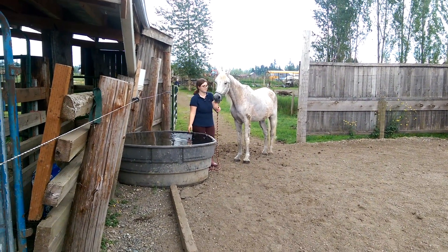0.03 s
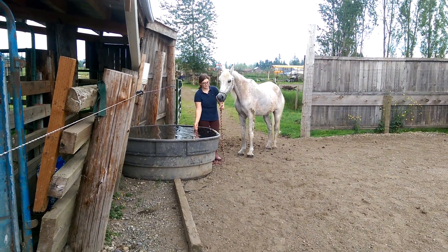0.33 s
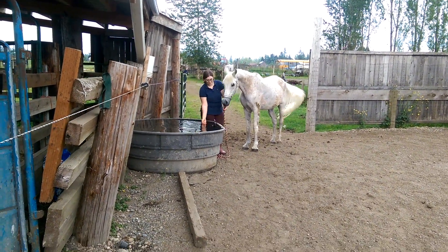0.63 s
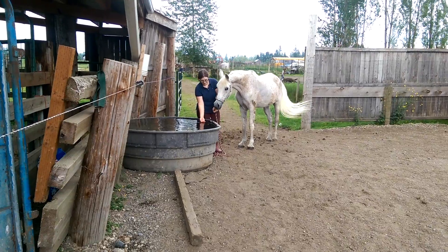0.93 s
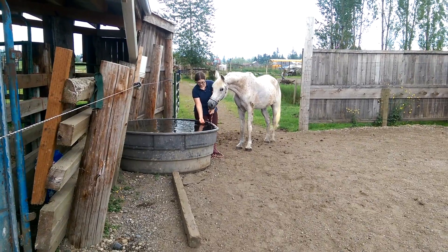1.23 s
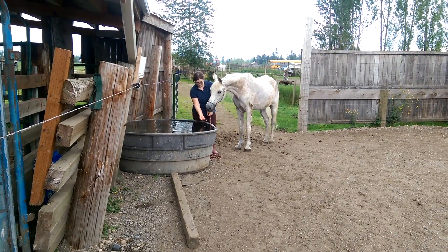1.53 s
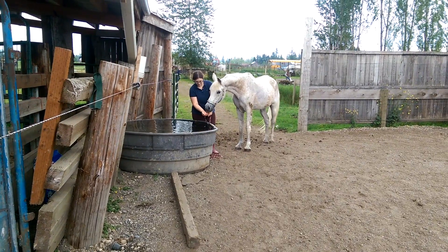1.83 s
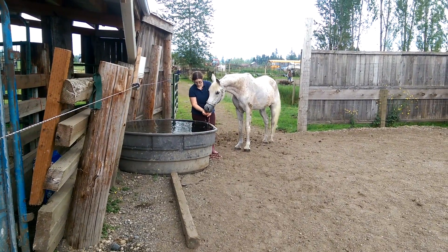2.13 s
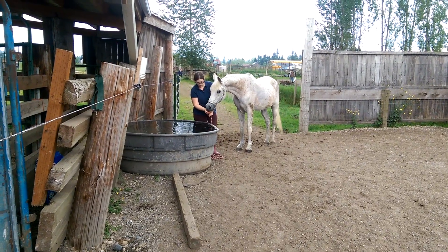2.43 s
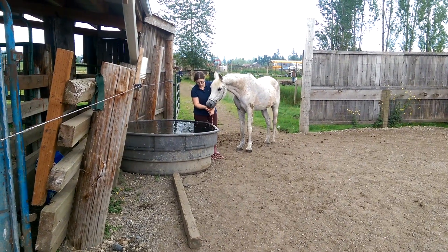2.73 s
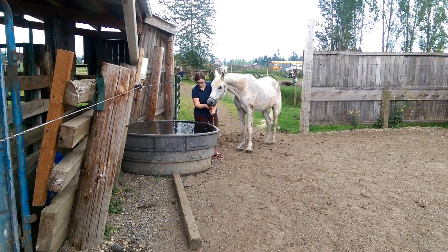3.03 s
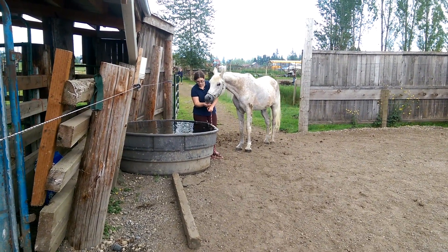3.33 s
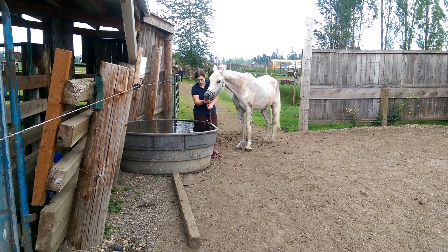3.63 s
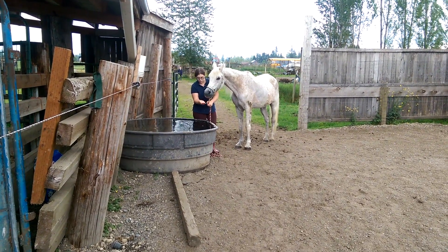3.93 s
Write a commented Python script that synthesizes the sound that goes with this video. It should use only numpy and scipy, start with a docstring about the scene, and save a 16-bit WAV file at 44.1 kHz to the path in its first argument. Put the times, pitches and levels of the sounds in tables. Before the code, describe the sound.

Quiet open-air background noise fills a dirt paddock: a soft hiss of air and leaves over a distant engine hum. A horse stamps once with a dull thud, and faint far birds chirp among small ticks and taps.

```python
"""A distant engine hums under a soft hiss of air and leaves, heard in stereo from a dirt paddock's edge.
Far birds whistle slurred notes that scatter off barn, fence and trees. A second in, a horse stamps
one hoof and the ground rings with a dull thud. Bubbles plip in a trough, rising in pitch as they
surface; small ticks, taps and scuffs come from near it, and one click from by the left microphone."""
import sys
import numpy as np
from scipy import signal
from scipy.fft import rfft, irfft, next_fast_len
from scipy.io import wavfile
from scipy.ndimage import map_coordinates

SR = 44100
rng = np.random.default_rng(int(sys.argv[2]) if len(sys.argv) > 2 else 0)


def file_out(sig):
    """Save sig as 16-bit WAV at sys.argv[1]."""
    # one column per channel
    cols = np.atleast_2d(sig).T
    # limit, then scale
    lim = np.clip(cols, -1, 1)
    pcm = np.round(lim * 32767).astype(np.int16)
    wavfile.write(sys.argv[1], SR, pcm)


N = 176400
T = np.arange(N) / SR

# air and leaves all around: f/Hz, relative level/dB
AIR_SPECTRUM = [(82, -42), (140, -2), (238, -5.5), (333, -5.5), (466, -8.5), (504, -7.5), (602, -10.5),
                (859, -9), (930, -10), (1250, -12), (3100, -9), (6680, -15), (9160, -17), (14100, -25),
                (15600, -45)]
# the side the hiss leans to: f/Hz, pan/dB (left minus right throughout)
AIR_PAN = [(200, 2.5), (550, 2.8), (2000, -0.1), (4000, 1), (8000, -1.2), (10000, 3), (12500, -5)]
# how alike diffuse noise is at the two microphones: f/Hz, coherence
COHERENCE = [(60, 0.65), (150, 0.66), (300, 0.69), (550, 0.44), (1000, 0.14), (2000, -0.18), (12000, 0.032)]
# the far engine's shaft rotation: t/s, f/Hz
SHAFT_SPEED = [(0, 33.1), (1, 33), (1.5, 32.61), (4, 32.62)]
# its hum at twice the shaft rate: t/s, level/dB
SECOND_ORDER = [(0, -49.5), (.18, -52), (.45, -55), (.9, -49.5), (1.1, -48.5), (1.35, -53.5), (1.53, -58.5),
                (1.7, -54.5), (1.85, -51), (2.1, -48.5), (2.4, -49), (2.72, -53), (3.05, -49.8), (3.4, -49),
                (3.75, -50.5), (3.87, -54.5), (4, -51.5)]
# its hum at three times the shaft rate: t/s, level/dB
THIRD_ORDER = [(0, -65), (.3, -56.5), (.52, -54), (.85, -63), (1.25, -57), (1.599, -62), (1.85, -55),
               (2.05, -54.5), (2.35, -68), (2.65, -55), (2.95, -56.5), (3.17, -67.5), (3.42, -58),
               (3.7, -58), (4, -64)]
# the rumble under the hum: f/Hz, relative level/dB
RUMBLE_SPECTRUM = [(18, -14), (35, -0.5), (55, 1), (82, 4), (100, 2.5), (122, -1.5), (145, -5.5),
                   (190, -33.5)]
# far bird notes: t/s, length/s, start f/Hz, middle f/Hz, end f/Hz, relative level/dB, pan/dB
CHIRPS = [(0.485, 0.071, 2850, 3050, 3120, -71.5, -4), (1.102, .05, 2900, 3140, 3270, -73, 0),
          (1.53, 0.22, 3350, 4306, 4780, -69.5, -8), (1.854, 0.038, 5000, 4180, 3400, -66.5, -5),
          (2.3, 0.031, 3900, 4300, 4700, -67, -4), (2.346, 0.083, 3300, 2963, 3110, -70, -4),
          (2.49, .09, 4390, 3435, 2866, -67, -9), (2.549, .04, 4400, 4020, 3630, -69, -2),
          (2.58, .08, 3070, 2960, 3400, -76, -8), (2.83, 0.057, 4720, 4150, 3118, -61.5, -5),
          (2.898, 0.033, 4100, 3650, 3250, -67, 3)]
# farther calls, blurred into a band of noise: t/s, length/s, level/dB
TWITTERS = [(.54, .08, -66), (1.121, 0.092, -66.5), (2.52, 0.13, -66.5), (3.49, .07, -69)]
# one nearer note, thin and high: t/s, length/s, start f/Hz, end f/Hz
PEEP = (.303, .052, 8650, 8590)
# sharp ticks near the trough: t/s, relative level/dB, f/Hz, t60/s, Q, pan/dB
TICKS = [(0.4, -52, 10000, 0.018, 1, 6), (.827, -53, 9000, .012, 1, 2), (1.026, -54, 10000, .02, 1, 2),
         (2.1717, -46, 9500, 0.013, 3.3, 7), (2.177, -55, 10000, 0.034, 1.4, 4),
         (2.409, -56, 13000, .015, 1, 0)]
# a dry click right by the left microphone: t/s, level/dB, f/Hz, t60/s, pan/dB
CLICKS = [(0.9625, -29.5, 8800, 0.00056, 26)]
# light taps: t/s, level/dB, f/Hz, t60/s, Q
TAPS = [(.47, -59.5, 2070, .14, 3.4), (0.774, -58, 970, 0.13, 0.83), (1.596, -58, 1630, 0.076, 3.3),
        (1.768, -56.5, 2270, 0.1, 5), (3.355, -61, 2000, .1, 3), (3.38, -61, 2300, 0.098, 3),
        (3.903, -57.5, 4150, 0.18, 5.8), (3.918, -52, 199, 0.091, 1.9)]
# scuffs on dirt: t/s, rise/s, hold/s, t60/s, level/dB, pan/dB
SCUFFS = [(-.02, 0.029, 0.2, 1.35, -60, -6), (3.886, .01, .03, 0.6, -61.5, 5)]
# one spectrum for each scuff: f/Hz, relative level/dB
SCUFF_SPECTRA = [
    [(120, -8), (330, 6), (450, -2.5), (620, 0), (950, -9), (1600, -0.5), (3000, -8), (5500, -19),
     (10000, -16.5), (15000, -31)],
    [(200, -16), (1500, 4), (2800, -1), (4200, 9), (5500, -1), (8000, 1), (15000, -20)],
]
# bubbles in the trough: t/s, length/s, start f/Hz, end f/Hz, level/dB
PLIPS = [(1.986, .054, 556, 1124, -58), (2.04, 0.032, 1307, 1850, -66.5)]
# the hoof's blow and its settling: t/s, level/dB
HOOF_BLOWS = [(1.014, -31.5), (1.0442, -38), (1.073, -50), (1.112, -42)]
# the ground ringing under the hoof: f/Hz, relative level/dB, t60/s
GROUND_MODES = [(100.4, 0.5, 0.14), (123.8, -12, 0.51), (181, -13.5, 0.4), (200, -19.5, 0.51),
                (245.7, -14, 0.3), (283, -9, 0.18), (299, -22, 0.36), (502.5, -23, 0.17), (634, -33, 0.19)]
# the stamp's low noise: f/Hz, relative level/dB
THUD_SPECTRUM = [(50, -22), (85, 10), (130, -9), (300, -2.5), (420, -20), (750, -19), (1300, -40.5)]

YARD_T60 = 0.35  # s


def amp(db):
    """Decibels to gain."""
    return 10 ** (np.asarray(db) / 20)


def unit(x):
    """Scaled to rms 1."""
    return x / np.sqrt(np.mean(x ** 2) + 1e-20)


def along(points, hz):
    """A curve of (f/Hz, value) points, read on a log frequency axis."""
    f, v = np.transpose(points)
    return np.interp(np.log(hz + 1), np.log(f + 1), v)


def wobble(rate):
    """A smooth random curve, rate knots a second."""
    return map_coordinates(rng.standard_normal(int(N * rate / SR) + 4), [T * rate])


def filtered(x, response):
    """x shaped by a gain that depends on frequency."""
    size = next_fast_len(N + SR // 2)
    return irfft(rfft(x, size) * response(np.fft.rfftfreq(size, 1 / SR)), size)[..., :N]


def pan(db):
    """Constant-power gains, the left db above the right."""
    return unit(amp(np.array([[db], [-db]]) / 2))


def band(hz, q):
    """Stereo noise through one resonance, applied twice."""
    def resonance(f):
        damping = (f * hz / q) ** 2
        return damping / ((hz * hz - f * f) ** 2 + damping)
    return unit(filtered(rng.standard_normal((2, N)), resonance))


def diffuse(spectrum):
    """Noise of rms 1 from all around, most alike at the two microphones in the bass."""
    def mid_side_gains(hz):
        angle = np.arccos(np.clip(along(COHERENCE, hz), -1, 1)) / 2
        return amp(along(spectrum, hz)) * [np.cos(angle), np.sin(angle)]
    mid, side = filtered(rng.standard_normal((2, N)), mid_side_gains)
    return unit(np.array([mid + side, mid - side]))


def burst(start, rise, hold, t60):
    """Linear attack, hold and exponential release."""
    return np.clip((T - start) / rise, 0, 1) * amp(-60 * np.maximum(T - start - rise - hold, 0) / t60)


def ring(start, hz, t60, rise):
    """One struck mode: a decaying sine."""
    return burst(start, rise, 0, t60) * np.sin(2 * np.pi * hz * (T - start))


def glide(start, length, pitches, waver):
    """A rounded whistle that passes smoothly through the pitches."""
    progress = np.clip((T - start) / length, 0, 1)
    contour = np.polyfit(np.linspace(0, 1, len(pitches)), np.log(pitches), len(pitches) - 1)
    hz = np.exp(np.polyval(contour, progress)) * (1 + waver * wobble(300))
    envelope = np.sqrt(2 * np.abs(np.sin(np.pi * progress)))
    return envelope * np.sin(2 * np.pi * np.cumsum(hz) / SR)


def yard(x):
    """A short scatter from barn, fence and trees."""
    t = T[:SR // 2]
    tail = rng.standard_normal((2, len(t))) * amp(-60 * t / YARD_T60)
    return signal.fftconvolve(x, tail / np.linalg.norm(tail[0]), axes=1)[:, :N]


def air(level_db=-59.14):
    """Air and leaves all around the microphones: an even hiss that barely moves."""
    hiss = filtered(diffuse(AIR_SPECTRUM), lambda hz: amp(np.outer([.5, -.5], along(AIR_PAN, hz))))
    flutter_db = 0.35 * wobble(2.93) + 0.43 * wobble(16)
    return amp(level_db + flutter_db) * hiss


def engine(wander=0.0033, rumble_db=-60.5):
    """Far off, two low engine orders over a rumble, each swelling and fading on its way here."""
    shaft_hz = np.interp(T, *np.transpose(SHAFT_SPEED)) * (1 + wander * wobble(3.17))
    turns = np.cumsum(shaft_hz) / SR
    hum = sum(amp(np.interp(T, *np.transpose(levels))) * np.sin(2 * np.pi * order * turns)
              for order, levels in [(2, SECOND_ORDER), (3, THIRD_ORDER)])
    return np.sqrt(2) * hum * pan(1.0) + amp(rumble_db) * diffuse(RUMBLE_SPECTRUM)


def birds(direct_db=0.5, scatter_db=3, peep_db=-64, peep_scatter_db=-5):
    """Slurred notes smeared by distance, a blurred twitter behind them, a nearer peep on the left."""
    song = sum(amp(db) * pan(side) * glide(start, length, pitches, waver=0.022)
               for start, length, *pitches, db, side in CHIRPS)
    swells = sum(amp(db) * burst(start, length / 2, length / 2, YARD_T60)
                 for start, length, db in TWITTERS)
    twitter = swells * band(hz=3800, q=1.9)
    start, length, *pitches = PEEP
    peep = amp(peep_db) * pan(11) * glide(start, length, pitches, waver=0.0018)
    scatter = yard(amp(scatter_db) * song + amp(peep_scatter_db) * peep)
    return amp(direct_db) * song + twitter + peep + scatter


def small_sounds(tick_trim_db=-1.5):
    """Ticks, taps and gritty scuffs around the trough, and one click close to the left microphone."""
    ticks = sum(amp(db + tick_trim_db) * pan(side) * burst(start, 0.0001, 0, t60) * band(hz, q)
                for start, db, hz, t60, q, side in TICKS)
    click = sum(amp(db) * pan(side) * ring(start, hz, t60, rise=1 / SR)
                for start, db, hz, t60, side in CLICKS)
    taps = sum(amp(db) * burst(start, 0.0033, 0, t60) * band(hz, q) for start, db, hz, t60, q in TAPS)
    scuffs = sum(amp(db) * pan(side) * burst(*timing) * diffuse(spectrum)
                 for (*timing, db, side), spectrum in zip(SCUFFS, SCUFF_SPECTRA))
    grit = amp(2 * wobble(45))
    return ticks + click + taps + scuffs * grit


def water(scatter_db=-6):
    """In the trough, a little to the left, bubbles rise in pitch as they surface."""
    plips = pan(3.7) * sum(amp(db) * glide(start, length, pitches, waver=0.022)
                           for start, length, *pitches, db in PLIPS)
    return plips + amp(scatter_db) * yard(plips)


def hoof(thud_db=-49.5):
    """Straight ahead, a hoof stamps and settles, ringing the ground and leaving a low rumble."""
    blows = sum(amp(blow_db + mode_db) * ring(start, hz, t60, rise=0.00425)
                for start, blow_db in HOOF_BLOWS for hz, mode_db, t60 in GROUND_MODES)
    thud = burst(HOOF_BLOWS[0][0], rise=0.007, hold=0.048, t60=0.45) * diffuse(THUD_SPECTRUM)
    return blows + amp(thud_db) * thud


def scene():
    """Everything that reaches the paddock's edge."""
    return air() + engine() + birds() + small_sounds() + water() + hoof()


def record(dry):
    """The microphone chain keeps nothing above its band limit."""
    return filtered(dry, lambda hz: hz < 15780)


dry = scene()
out = record(dry)
file_out(out)
```